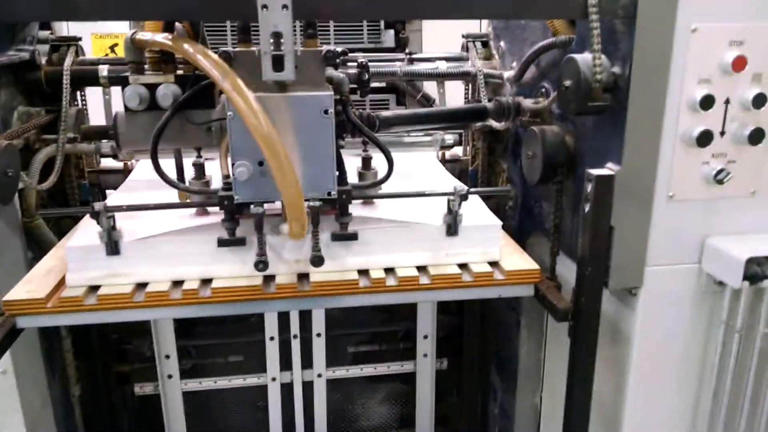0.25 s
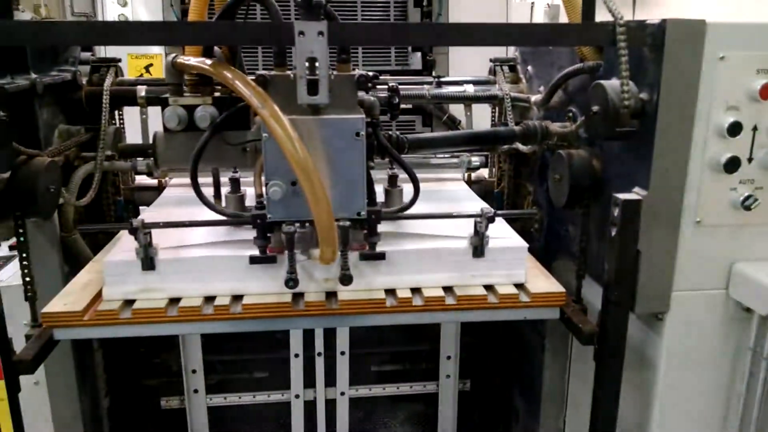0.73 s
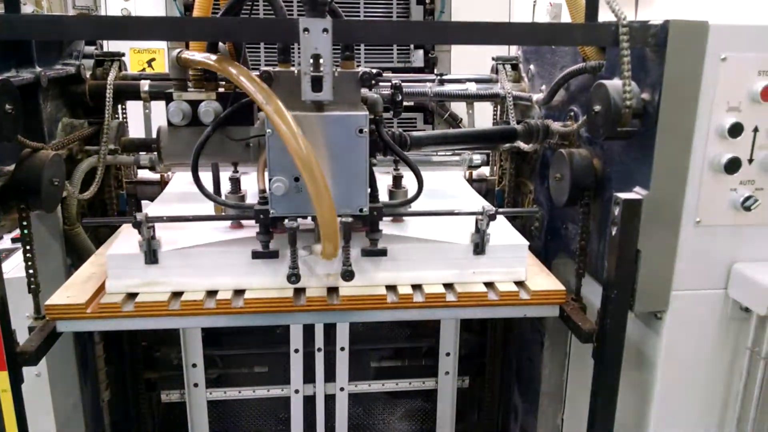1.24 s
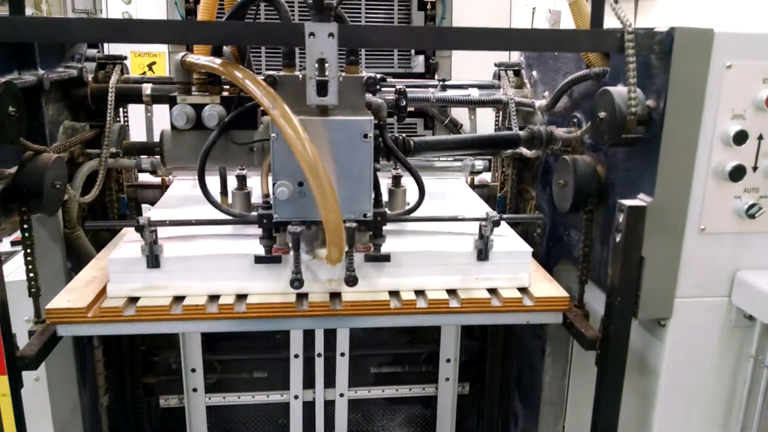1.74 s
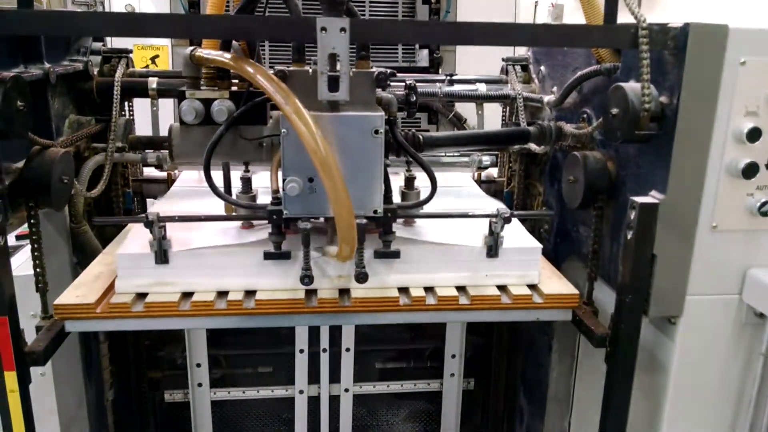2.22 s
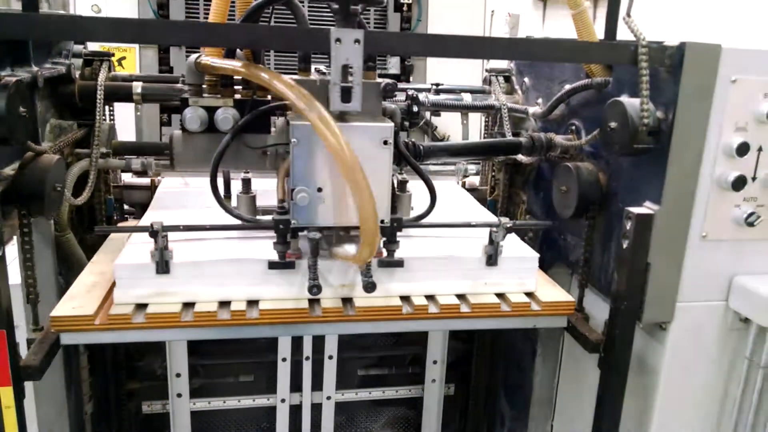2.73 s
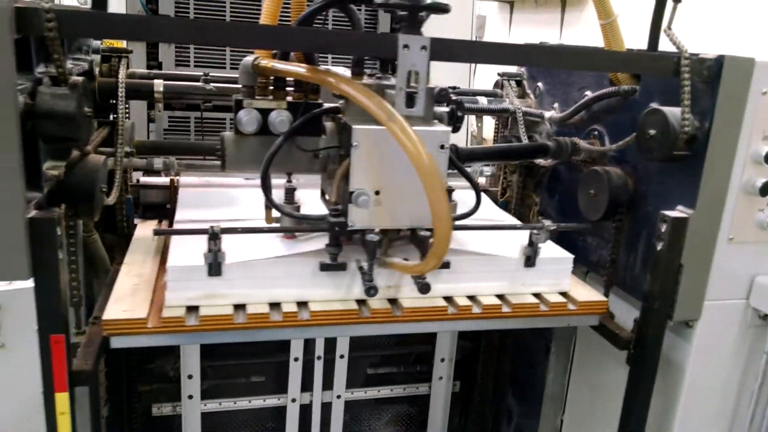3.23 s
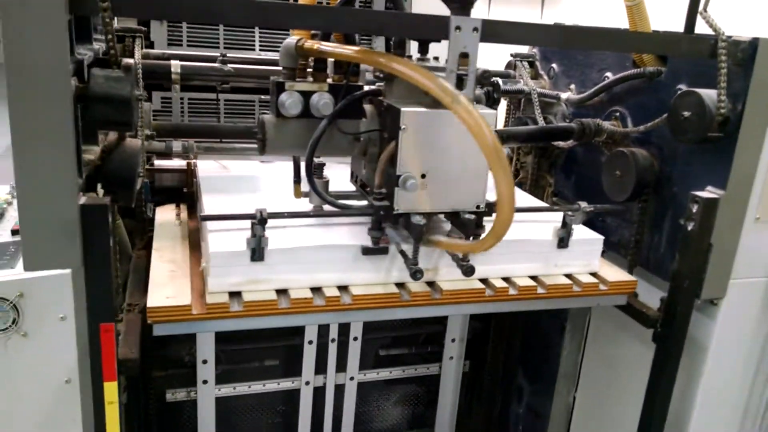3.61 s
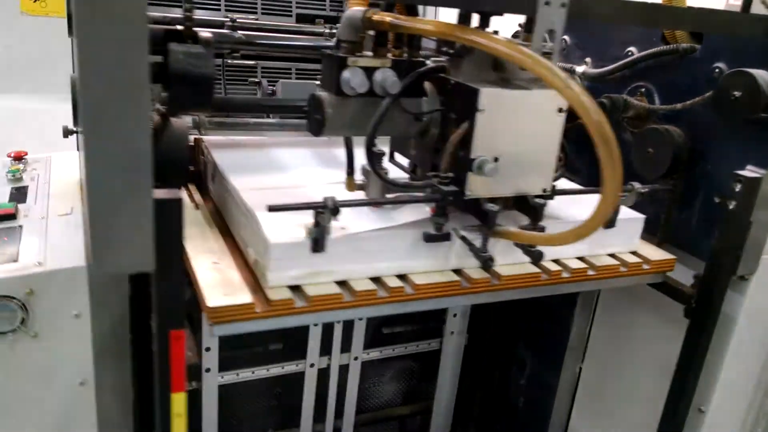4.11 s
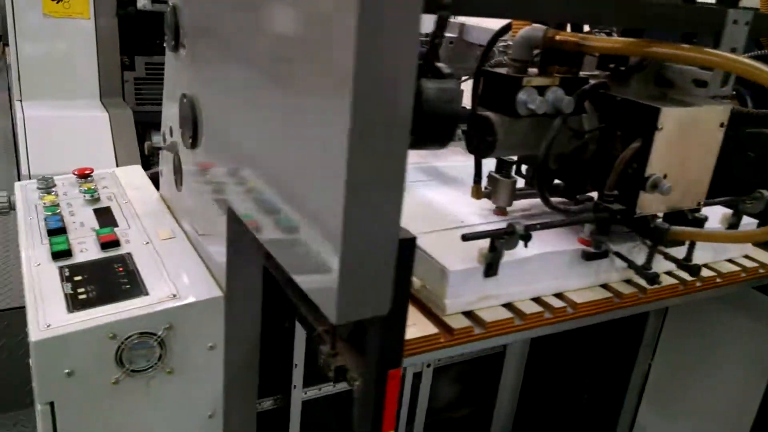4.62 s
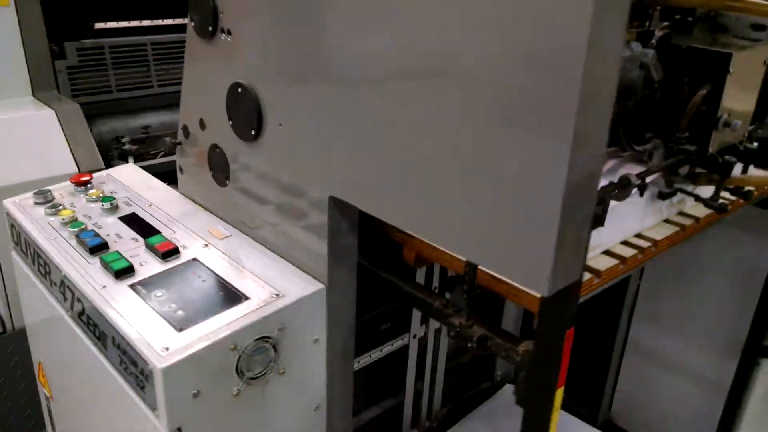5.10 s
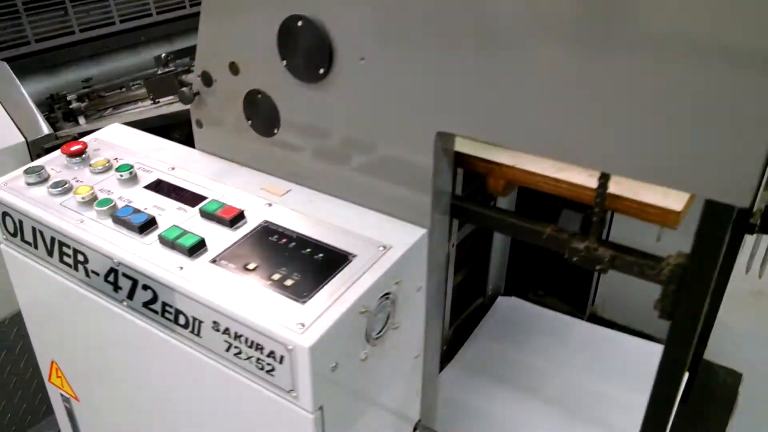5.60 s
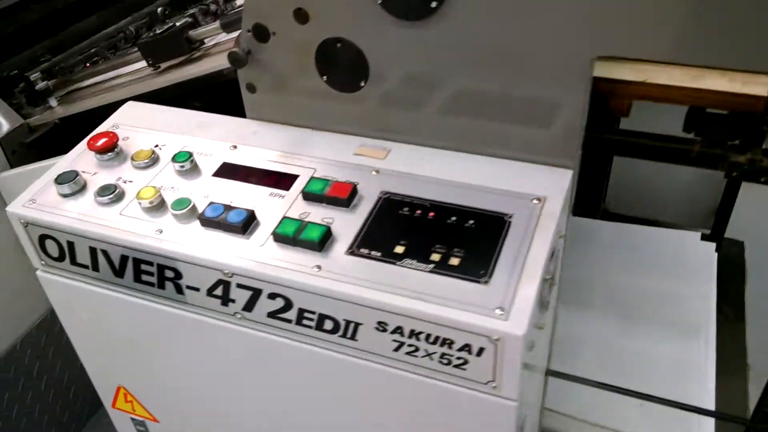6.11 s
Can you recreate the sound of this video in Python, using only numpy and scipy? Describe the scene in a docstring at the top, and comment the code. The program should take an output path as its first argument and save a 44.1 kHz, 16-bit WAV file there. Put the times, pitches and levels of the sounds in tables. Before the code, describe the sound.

Constant mechanical din of rollers and chains, pulsing hiss of compressed air, droning pump and sharp steel clicks, heard close from a moving handheld microphone.

```python
"""A sheet-fed offset press runs in a workshop: noise bands make its gears and rollers rumble and its links rattle.
Drifting sine tones hum for the vane pump and motor. Patchy noise hisses for the feeder's air, which swells
about twice for every sheet. Noise bursts and ringing modes make suckers and grippers clink.
A hand-held camera with two cross-fed microphones moves round the press; low pops and flutter sit
between the channels, and for a moment the treble is muffled, most on the right."""
import sys
import numpy as np
from scipy import signal
from scipy.fft import rfft, irfft, next_fast_len
from scipy.io import wavfile
from scipy.ndimage import uniform_filter1d, map_coordinates

SR = 44100
rng = np.random.default_rng(int(sys.argv[2]) if len(sys.argv) > 2 else 0)


def digitize_waveform(pressure):
    """Quantize a signal to 16-bit integers and store it at the path in sys.argv[1].

    Rows of a 2-D input are taken as channels; values are limited to [-1, 1].
    """
    field = np.atleast_2d(pressure).T
    bounded = np.clip(field, -1, 1)
    quanta = np.round(bounded * 32767).astype(np.int16)
    wavfile.write(sys.argv[1], SR, quanta)


N = 280035
T = np.arange(N) / SR

PUMP_HZ = 204.22  # beat of the vanes
PORT_DELAY_S = 17.2 / 44100  # travel time of the cross-feed
CYCLE_S, CYCLE_START_S = 0.9165, 0.69  # one sheet, and where a cycle begins

# air that always escapes, as the camera goes round: (time [s], air jets [dB], wide blast [dB])
LEAK_LEVELS = [(0, -20, -28), (.8, -21.5, -31), (1.7, -22, -29.5), (2.2, -19, -29.5), (2.6, -22.6, -30),
               (3.1, -23, -32.5), (3.5, -26, -32.5), (4, -22.5, -33.5), (4.45, -25.5, -32.5),
               (4.85, -20.5, -27.5), (5.3, -27, -33.5), (5.8, -23.5, -31), (6.35, -21, -27)]
# ringing modes of suckers and grippers: (frequency [Hz], 60 dB decay time [s])
STEEL_MODES = [(3300, 0.028), (3880, 0.014), (4850, 0.023), (6200, 0.012), (8700, 0.013), (11160, 0.012),
               (11560, .015), (13900, .012)]


def amp(db):
    """Decibels to gain."""
    return 10 ** (np.asarray(db) / 20)


def unit(x):
    """Scale to rms 1."""
    return x / np.sqrt(np.mean(x ** 2) + 1e-20)


def along(points, hz):
    """Read (frequency, value) points on a log frequency axis."""
    f, v = np.transpose(points)
    return np.interp(np.log(hz + 1), np.log(f + 1), v)


def curves(rows):
    """One value per sample for each column after the time."""
    times, *columns = np.transpose(rows)
    return [np.interp(T, times, column) for column in columns]


def wobble(rate):
    """A smooth random curve through `rate` random knots a second."""
    knots = rng.standard_normal(int(N * rate / SR) + 4)
    return map_coordinates(knots, [T * rate])


def filtered(x, response):
    """Multiply the spectrum of x by a complex response of frequency."""
    size = next_fast_len(N + SR // 4)
    hz = np.fft.rfftfreq(size, 1 / SR)
    return irfft(rfft(x, size) * response(hz), size)[..., :N]


def stereo(pair, spectrum=((1, 0),)):
    """Two unrelated signals become mid and side, which the delayed cross-feed combs in turn."""
    # share of the opposite microphone fed into each channel: (frequency [Hz], share [0-1])
    crossfeed = [(100, 0.86), (2700, 0.98), (3800, 1), (5200, 0.6), (8000, 0.061), (15000, 0.4)]
    # difference between the microphones against their sum: (frequency [Hz], level [dB])
    spread = [(100, -16), (250, -19.5), (500, -11), (1000, -3), (1400, 5.5), (2050, -4.5), (2350, 14.5),
              (2680, 27), (2900, -3.5), (4000, -5), (4700, 2.5), (5100, 0), (5700, -1.5), (8000, 0)]

    def response(hz):
        share = np.clip(along(crossfeed, hz), 0, 0.99)
        feed = share * np.exp(-2j * np.pi * hz * PORT_DELAY_S)
        ways = np.array([1 - feed, (1 + feed) * amp(along(spread, hz))])
        return ways / np.linalg.norm(ways, axis=0) * amp(along(spectrum, hz))

    mid, side = filtered(pair, response)
    return np.array([mid + side, mid - side])


def beam(pair, alike):
    """A near source reaches the right channel first; the cross-feed hands it to the left late and inverted."""
    alike = np.clip(alike, 0, 1)
    right, stray = pair
    late = filtered(right, lambda hz: -np.exp(-2j * np.pi * hz * PORT_DELAY_S))
    left = alike * late + np.sqrt(1 - alike ** 2) * stray
    return np.array([left, right])


def patchy(x, depth_db, bins=4, frames=5):
    """Turbulence: patches of random gain, a few hundred Hz wide and some tens of ms long."""
    z = signal.stft(x, nperseg=512)[2]
    field = uniform_filter1d(rng.standard_normal(z.shape), bins, axis=1)
    field = uniform_filter1d(field, frames, axis=2)
    gain = amp(depth_db * np.tanh(unit(field)))
    return signal.istft(z * gain, nperseg=512)[1][:, :N]


def rush(spectrum, patchy_db):
    """Coloured, patchy noise of rms 1 in the stereo of the cross-fed microphones."""
    noise = patchy(rng.standard_normal((2, N)), patchy_db)
    return unit(stereo(noise, spectrum))


def hiss(spectrum, patchy_db):
    """Two unrelated coloured, patchy noises of rms 1."""
    noise = patchy(rng.standard_normal((2, N)), patchy_db)
    return unit(filtered(noise, lambda hz: amp(along(spectrum, hz))))


def tones(table, drift, flicker_db):
    """Two sets of steady lines whose phase and strength wander as the camera moves through standing waves."""
    pair = np.zeros((2, N))
    slow = T[::100]

    def wander():
        return map_coordinates(rng.standard_normal(64), [slow * 6])

    for hz, db in table:
        for way in pair:
            phase = 2 * np.pi * (hz * T + rng.random()) + np.interp(T, slow, drift * wander())
            strength = amp(db + flicker_db * wander())
            way += np.interp(T, slow, strength) * np.sin(phase)
    return np.sqrt(2) * pair  # levels are rms


def shaft(sharpness):
    """The pump shaft turns once in seven vane beats: a pulse per turn, mean 0 and rms 1."""
    pulse = np.exp(sharpness * np.cos(2 * np.pi * PUMP_HZ / 7 * T))
    return unit(pulse - pulse.mean())


def drive_effort():
    """Levels of rumble and rattle in dB: each sheet loads the drive in the same way."""
    # drive before load, as the camera goes round: (time [s], gear and roller rumble [dB], link rattle [dB])
    drive_levels = [(0.0, -32.5, -33), (0.6, -33, -35), (1.3, -33.5, -36.5), (2.0, -33, -35.5),
                    (2.7, -34, -36), (3.3, -34, -36.5), (3.55, -37.5, -38.5), (4.05, -32, -32.5),
                    (4.45, -35.5, -35.5), (4.8, -32, -34.5), (5.15, -30.5, -30), (5.6, -34.5, -38),
                    (6.1, -30, -32.5), (6.35, -26.5, -33)]
    # load added in every sheet's cycle: (time into cycle [s], rumble [dB], rattle [dB])
    cycle_load = [(0, 1.5, 0.5), (.2, 3, 2.5), (.44, 5.5, 4), (.5, 5.5, 4.5), (.55, 2, 2.5), (.68, 4, 2),
                  (.82, 4, 6), (.89, 4.5, 6), (.916, 1, 1.5)]
    # brief swells and drops of the din: (start [s], end [s], rumble change [dB], rattle change [dB])
    lurches = [(0.3, 0.353, -1.5, -6), (2.94, 2.978, 3, 3), (3.433, 3.49, 2, 0), (4.093, 4.16, 4.5, 1.5),
               (4.17, 4.27, -12, -2.5), (5.245, 5.307, -4, -6.5), (5.328, 5.406, 4.5, 3.5)]
    edge_s = 0.013
    into_cycle = (T - CYCLE_START_S) % CYCLE_S
    times, *loads = np.transpose(cycle_load)
    level = np.array(curves(drive_levels)) + [np.interp(into_cycle, times, load) for load in loads]
    for start, end, rumble_db, rattle_db in lurches:
        inside = np.clip(0.5 + np.minimum(T - start, end - T) / edge_s, 0, 1)
        level += inside * [[rumble_db], [rattle_db]]
    return level


def drive():
    """Gears and rollers rumble, chains and links rattle, pump and motor hum."""
    # colour of gears and rollers: (frequency [Hz], level per Hz [dB])
    rumble_colour = [(25, -18), (70, -8.5), (120, -3.5), (190, -3), (270, 1.5), (360, 3.5), (480, 0.5),
                     (600, 1.5), (720, -1.5), (900, -10), (1500, -35)]
    # colour of chains and links: (frequency [Hz], level per Hz [dB])
    rattle_colour = [(400, -13), (800, -1.5), (1000, -1), (1250, 1.5), (1330, -3), (1410, 1), (1550, -2.5),
                     (1800, -3), (2050, -5), (2350, -2), (4000, -53)]
    # steady tones of pump and gears, before nearness: (frequency [Hz], level [dB rms])
    hum_lines = [(204.2, -46), (525, -49), (613.5, -48), (1122, -52.5), (1257, -53.5), (1402, -48.5)]
    # wavering drone of the main motor, before nearness: (frequency [Hz], level [dB rms])
    motor_lines = [(120, -51), (169.5, -46.5), (262, -46.5), (350, -45.5), (378, -48)]
    # nearness as the camera goes round: (time [s], pump gain [dB], motor gain [dB])
    nearness = [(0, 7.5, -15), (1.1, 1, -11), (2.1, 4.5, -4), (3.0, 0.5, -10), (3.65, 1, -0.5),
                (4.4, 0.5, -4), (5.05, 2, 6), (5.45, 0, 3), (6.35, 3, 5.5)]
    rumble_db, rattle_db = drive_effort()
    pump_db, motor_db = curves(nearness)
    turn = shaft(sharpness=7.8)
    rumble_db = rumble_db + 0.31 * wobble(30) + 0.5 * turn
    rattle_db = rattle_db + 0.57 * wobble(12) + 1.08 * wobble(90) + 0.5 * turn
    rumble = amp(rumble_db) * rush(rumble_colour, patchy_db=0.3)
    rattle = amp(rattle_db) * rush(rattle_colour, patchy_db=2.5)
    hum = amp(pump_db) * stereo(tones(hum_lines, drift=0.45, flicker_db=2.2))
    drone = amp(motor_db) * stereo(tones(motor_lines, drift=2.8, flicker_db=2.5))
    balance = amp([[-0.8], [0.8]])  # left, right
    return (rumble + hum + drone) * balance + rattle


def air_flow():
    """Levels of jets and blast in dB: the steady leak plus, in power, a puff for each opening of a valve."""
    # openings of the feeder's valves:
    # (start [s], time until closing begins [s], air jets [dB], wide blast under the sheet [dB])
    puffs = [(-.044, .29, -19, -26), (.413, 0.255, -18.5, -22.5), (.856, 0.32, -19.5, -26),
             (1.317, .268, -21.5, -26.5), (1.33, 0.13, -19.5, -28), (1.759, .36, -22, -25.5),
             (1.85, 0.13, -17, -27), (2.219, 0.29, -22, -26.5), (2.24, 0.14, -18, -33),
             (2.6, 0.4, -22.5, -27), (3.178, 0.24, -18, -24), (3.624, 0.19, -21.5, -26),
             (3.824, 0.51, -28, -27), (4.51, 0.2, -18.5, -26), (4.956, 0.26, -17, -25.5),
             (4.99, 0.15, -19, -25.5), (5.418, 0.2, -24.5, -31.5), (5.947, 0.22, -27.5, -28)]
    open_s, close_s = 0.12, 0.078  # a valve opens slowly and shuts fast
    snap_shut_s = 0.039  # one that ends a sheet's cycle snaps shut
    power = amp(curves(LEAK_LEVELS)) ** 2
    for start, held, jets_db, blast_db in puffs:
        age = T - start
        ends_cycle = np.cos(2 * np.pi * (start + held - CYCLE_START_S) / CYCLE_S) > 0.85
        closing = snap_shut_s if ends_cycle else close_s
        valve = np.clip(age / open_s, 0, 1) * np.clip(1 - (age - held) / closing, 0, 1)
        power += (amp([[jets_db], [blast_db]]) * valve) ** 2
    return 10 * np.log10(power)


def swaying(x, depth, rate):
    """The colour of a noise drifts up and down, its peaks and notches with it, by varying the reading speed."""
    place = np.cumsum(1 + depth * wobble(rate))
    return np.array([map_coordinates(way, [place], order=5, mode="mirror") for way in x])


def feeder_air():
    """Jets hiss, high pump harmonics whistle and a wide blast rushes in puffs; the vanes pulse the flow."""
    # colour of the air jets: (frequency [Hz], level per Hz [dB])
    jet_colour = [(4000, -52), (7000, -7.5), (8200, -8), (9700, -2), (9980, 3), (10350, -3.5), (10850, 2),
                  (11150, 2.5), (11800, -0.5), (12400, 2), (12950, 2.5), (13600, -2), (14600, -4.5),
                  (15500, -6.5)]
    # colour of the blast under the sheet: (frequency [Hz], level per Hz [dB])
    blast_colour = [(1500, -4), (2200, -10), (2600, -32), (2870, 8.5), (3100, -0.5), (3900, -0.5),
                    (4300, 2), (4550, 1), (4770, 4.5), (5100, 1), (5600, 2), (7000, -1), (9000, 0),
                    (14000, -18)]
    # thin high whistles, mostly harmonics of the pump's beat, which follow the level of the jets:
    # (frequency [Hz], level against the jets [dB])
    whistle_lines = [(4770, -30), (8952, -27), (9158, -26), (9567, -28), (9974, -22), (11111, -26),
                     (11201, -24), (11378, -25), (11991, -27), (12196, -26), (12425, -23), (12805, -21),
                     (13008, -20), (13120, -27), (13413, -26), (13447, -25)]
    jets_db, blast_db = air_flow()
    vane = 2 * np.pi * PUMP_HZ * T
    pulsing = 1 + 0.019 * np.sin(vane) + 0.0052 * np.sin(3 * vane) + 0.0077 * shaft(sharpness=8)
    flow = pulsing * amp(0.48 * wobble(60) + 0.37 * wobble(350))

    jet_noise = beam(hiss(jet_colour, patchy_db=2.5), alike=0.82)
    jets = amp(jets_db) * jet_noise * amp([[-0.4], [0.4]])

    blast_noise = swaying(rush(blast_colour, patchy_db=4.0), depth=0.018, rate=5)
    blast_db = blast_db + 0.6 * wobble(24.98) + 0.51 * wobble(130)
    blast = amp(blast_db) * blast_noise * amp([[0.5], [-0.5]])

    whistles = amp(jets_db) * beam(tones(whistle_lines, drift=1.1, flicker_db=2), alike=0.8)
    return flow * (jets + blast + whistles)


def pump_notes(note_swell=0.4, whine_swell=0.67):
    """The vanes' second harmonic and a clean whine, probably a pump gear, swell with every puff of air."""
    # the pump's strongest note, before the swell: (time [s], level [dB rms])
    note_levels = [(0, -33.5), (1.3, -36.5), (2.05, -34), (3.0, -37), (3.7, -42.5), (4.3, -41.5),
                   (5.1, -30.5), (5.4, -35.5), (6.35, -35)]
    # the clean whine, before the swell: (time [s], level [dB rms])
    whine_levels = [(0, -42.5), (4.2, -44), (6.35, -49)]
    whine_hz = 764.4
    puff_db = air_flow()[1] - curves(LEAK_LEVELS)[1]
    puff_db = puff_db - puff_db.mean()
    pair = np.zeros((2, N))
    voices = [(2 * PUMP_HZ, note_levels, note_swell), (whine_hz, whine_levels, whine_swell)]
    for hz, levels, swell in voices:
        phase = 2 * np.pi * hz * T + 0.12 * np.array([wobble(5) for _ in pair])
        level_db = curves(levels)[0] + swell * puff_db + 0.38 * wobble(10)
        pair += amp(level_db) * np.sin(phase)
    return np.sqrt(2) * pair


def low_pops(tick_width=0.00089, flutter_width=0.0012, low_hz=24, flutter_rate=170):
    """Soft pops, a faint even ticking, flutter and one knock: smooth pushes, opposite in the two channels."""
    # levels here are ahead of the common gain, bass roll-off and channel balance below
    # strongest pops and thumps: (time [s], level [dB], time to peak [s])
    strong_pops = [(0.123, -18, .001), (0.283, -18, .001), (0.443, -17, 0.0011), (0.843, -16, .001),
                   (1.163, -10, 0.0012), (2.403, -17, 0.0011), (2.523, -17, 0.00092), (2.762, -15, 0.00091),
                   (2.771, -12, .0016), (2.799, -10, .0017), (2.807, -9, .002), (2.886, -14, 0.0019),
                   (2.928, -12, 0.0011), (2.957, -11, 0.0011), (2.963, -16, .0014), (3.174, -15, 0.0013),
                   (3.197, -16, 0.0009), (3.244, -18, .001), (3.563, -21, .001), (4.100, -11, 0.0012),
                   (4.110, -13, 0.0019), (4.134, -11, 0.0012), (4.147, -13, .0015), (4.278, -14, 0.0011),
                   (4.425, -17, 0.0011), (4.675, -15, .0011), (4.749, -16, 0.0014), (4.857, -17, 0.0021),
                   (5.22, -13, 0.0012), (5.380, -14, .001), (5.461, -15, 0.0019), (5.47, -10, .0015),
                   (5.541, -11, 0.0014), (5.939, -9, 0.0011)]
    # faint low ticking: (time [s], level [dB])
    tick_levels = [(0, -28), (1, -43), (2.1, -21), (3.7, -48), (5.7, -21.5)]
    # spells of flutter: (start [s], end [s], level [dB])
    flutter_spells = [(2.778, 2.795, -16), (2.849, 2.936, -17), (2.968, 3.071, -21), (4.106, 4.135, -15),
                      (4.838, 4.886, -17), (5.249, 5.337, -18.5)]
    # one hard knock on the microphones: (time [s], level [dB], time to peak [s])
    knock = (4.154, -5.5, 0.00066)
    ticks_per_s, tick_start_s, tick_scatter_db = 25, 0.0035, 4
    beat = np.arange(tick_start_s, T[-1], 1 / ticks_per_s)
    beat_db = np.interp(beat, *np.transpose(tick_levels))
    beat_db = beat_db + tick_scatter_db * rng.standard_normal(len(beat))
    pushes = [(s, amp(db), width) for s, db, width in strong_pops]
    pushes += [(s, amp(db), tick_width) for s, db in zip(beat, beat_db)]
    s, db, width = knock
    pushes.append((s, -amp(db), width))
    # flutter is a crowd of the same pushes, with either sign
    for start, end, db in flutter_spells:
        late, size = rng.standard_normal((2, 64))
        times = start + (np.arange(len(late)) + 0.26 * late) / flutter_rate
        pushes += [(s, amp(db) * np.tanh(2 * k), flutter_width) for s, k in zip(times, size) if s < end]
    bumps = np.zeros(N + SR)
    age = np.arange(SR // 50) / SR
    for s, gain, width in pushes:
        shape = (age / width) ** 2 * np.exp(2 - 2 * age / width)
        bumps[round(s * SR):][:len(age)] += gain * shape
    # the microphones' bass roll-off makes every push swing back past zero
    low = filtered(amp(5.5) * bumps[:N], lambda hz: 1j * hz / (low_hz + 1j * hz))
    return low * np.array([[0.83], [-1.17]])


def contacts(link_db=-24.5, link_range_db=9, link_t60=0.012, count=110):
    """List the blows of suckers and grippers, with chain links ticking at random in between."""
    # (time [s], burst level [dB], 60 dB decay time [s], bright share [0-1], main mode [Hz], ring level [dB])
    gripper_blows = [(0.167, -11.5, .03, 0.5, 11160, -16), (0.664, -8.5, 0.06, 0.35, 3300, -17.5),
                     (1.479, -6.5, 0.025, 0.35, 3880, -15), (1.5813, -7, 0.075, 0.25, 3300, -13),
                     (1.9995, -13.5, 0.06, 0, 3880, -8), (2.387, -9, .015, 0.86, 11160, -17),
                     (2.5008, -7.5, 0.05, 0.55, 11560, -11), (3.3288, -9, .05, 0.2, 4850, -13),
                     (3.4175, -5, 0.034, 0.55, 11160, -1), (3.817, -10, 0.04, 1, 11560, -13),
                     (4.135, -11, 0.13, 0.8, 11560, -18), (4.152, -4.5, 0.0088, 0.2, 8700, -21),
                     (4.227, -11.5, 0.11, 0.1, 4850, -18), (4.3117, -5.5, 0.055, 0.6, 11560, -9),
                     (4.875, -17, .04, 0.9, 11160, -19), (5.134, -11, .04, 0.3, 6200, -13),
                     (5.2329, -2.5, 0.013, 0.8, 13900, -7), (6.157, -10.5, .06, 0.3, 3880, -17),
                     (6.3003, -7, 0.035, 0.9, 11560, -10)]
    links = []
    for when, size, bright in rng.random((count, 3)):
        db = link_db - link_range_db * size
        main_hz = STEEL_MODES[int(bright * len(STEEL_MODES))][0]
        links.append((when * T[-1], db, link_t60, bright, main_hz, db))
    return gripper_blows + links


def clicks(blows):
    """Each contact blends a dull clack with a bright snap: a hard crack and a short burst dying in the frame."""
    # colour of the dull clack: (frequency [Hz], level per Hz [dB])
    clack_colour = [(300, -16), (1400, -6), (2400, -2), (3200, -0.5), (5000, -8), (8000, 1.5), (15500, -6)]
    # colour of the bright snap: (frequency [Hz], level per Hz [dB])
    snap_colour = [(2600, -18), (4500, -8), (8000, 5), (10000, 4.5), (11200, 10), (12200, 4), (13500, -8),
                   (15500, -16)]
    strength = np.zeros((2, N + SR))  # clack, snap
    age = np.arange(SR // 5) / SR
    for s, db, t60, bright, *_ in blows:
        share = np.clip(bright, 0, 1)
        decay = amp(-60 * age / t60) + 0.65 * amp(-60 * age / 0.009)
        burst = amp(db - 9) * decay
        strength[:, round(s * SR):][:, :len(age)] += np.sqrt([[1 - share], [share]]) * burst
    # the clack is struck first and coloured afterwards, so the microphones' comb marks even its attack
    grit = rng.standard_normal((2, N))
    clack = stereo(strength[0, :N] * grit, clack_colour) / np.std(stereo(grit, clack_colour))
    snap = strength[1, :N] * beam(hiss(snap_colour, patchy_db=4), alike=0.42)
    return clack + snap


def steel_ring(blows, other_modes_db=-14, attack_s=0.0002, bounce_s=0.005, bounce_db=-9, detune=0.006):
    """Every blow rings the steel and bounces once; where it lands decides which mode stands out."""
    pair = np.zeros((2, N + SR))
    age = np.arange(SR // 30) / SR
    hz, t60 = np.transpose(STEEL_MODES)[..., None]
    for s, *_, main_hz, ring_db in blows:
        distance = abs(hz - main_hz)
        mode_db = np.where(distance == distance.min(), 0, other_modes_db)
        bounce_at = s + bounce_s * (0.5 + rng.random())
        for at, loss_db in [(s, 0), (bounce_at, bounce_db)]:
            size_db, pitch = rng.standard_normal((2, len(hz), 1))
            phase = 2 * np.pi * (hz * (1 + detune * pitch) * age + rng.random((2, len(hz), 1)))
            level_db = ring_db + loss_db + mode_db + size_db
            modes = amp(level_db - 60 * age / t60) * np.sin(phase)
            ring = np.sum(modes, axis=1) * np.tanh(age / attack_s)
            pair[:, round(at * SR):][:, :len(age)] += ring
    return beam(pair[:, :N], alike=0.55)


def muffled(x, right_db=-24, left_db=-2.6, edge_hz=1100):
    """For a moment the treble drops, most on the right, as if a finger lay on that port."""
    covered = np.interp(T, [4.154, 4.156, 4.276, 4.279], [0, 1, 1, 0])
    treble = filtered(x, lambda hz: hz ** 2 / (hz ** 2 + edge_hz ** 2))
    return x + covered * treble * (amp([[left_db], [right_db]]) - 1)


def scene():
    """The press, briefly muffled, with the low pops of the microphones on top."""
    blows = contacts()
    press = drive() + feeder_air() + pump_notes() + clicks(blows) + steel_ring(blows)
    return muffled(press) + low_pops()


def record(dry):
    """The camera keeps nothing above its band limit."""
    top_hz = 15550
    return filtered(dry, lambda hz: hz < top_hz)


dry = scene()
out = record(dry)
digitize_waveform(out)
```